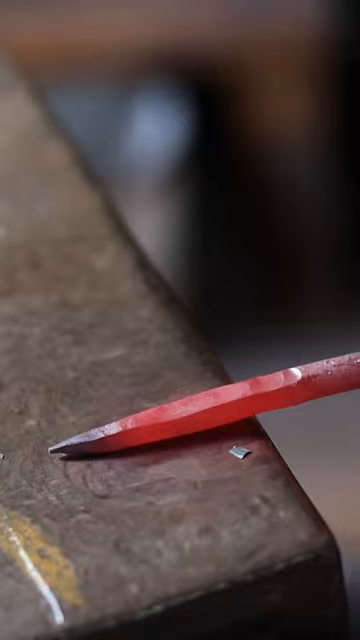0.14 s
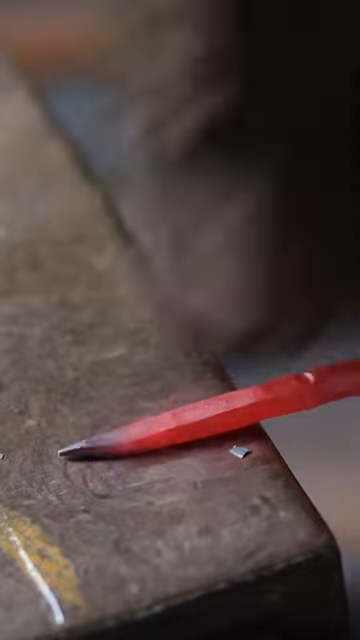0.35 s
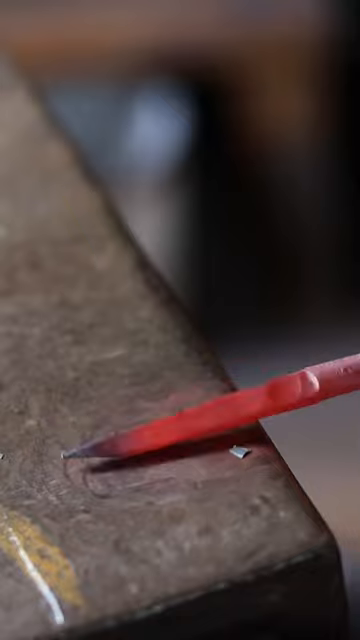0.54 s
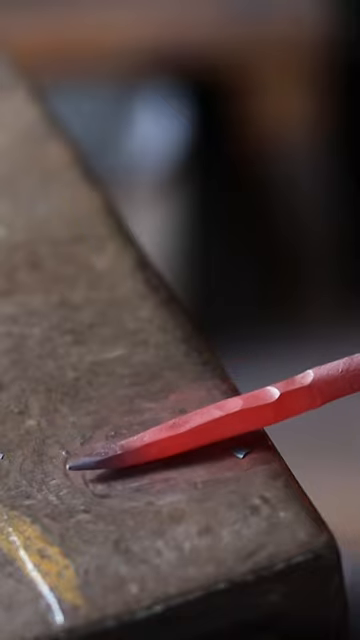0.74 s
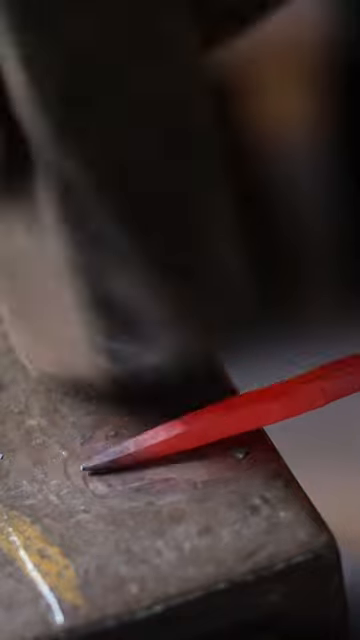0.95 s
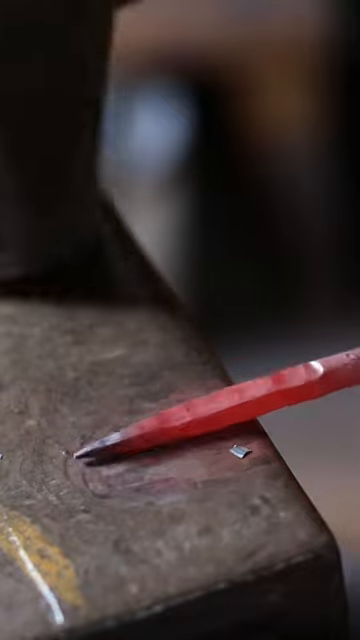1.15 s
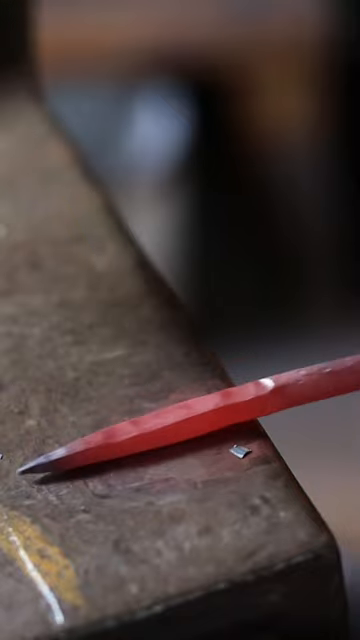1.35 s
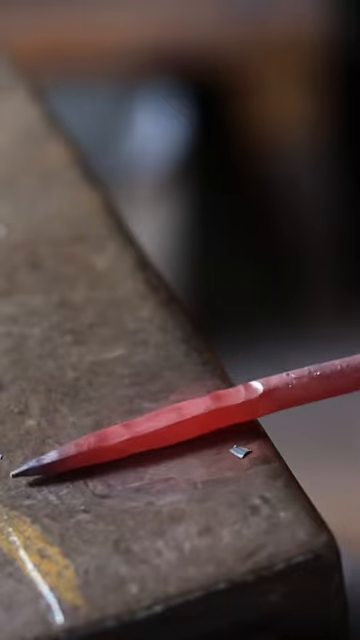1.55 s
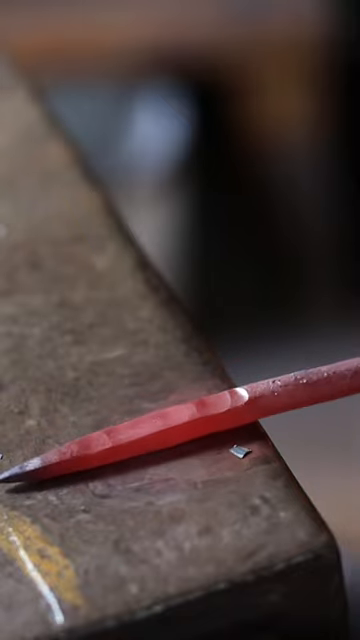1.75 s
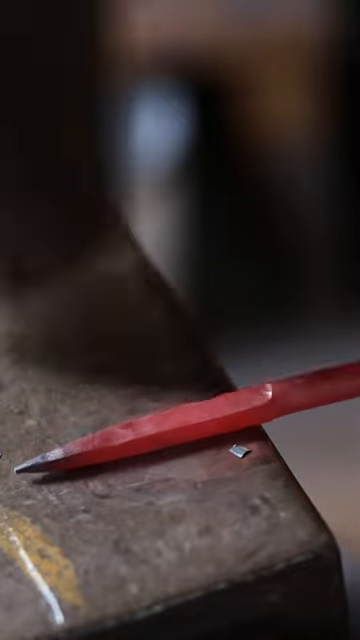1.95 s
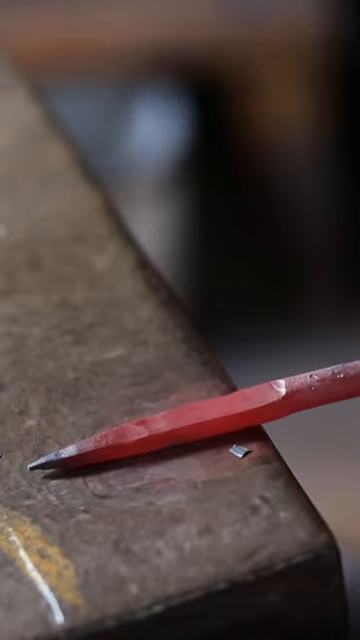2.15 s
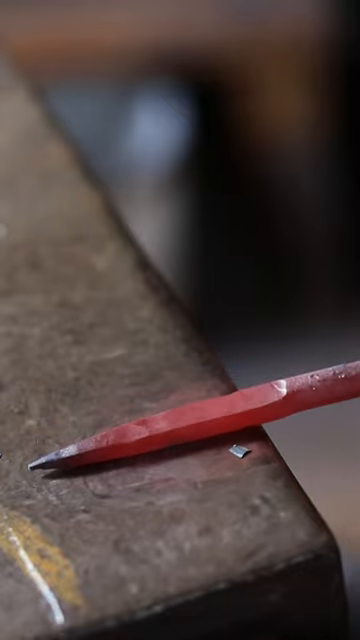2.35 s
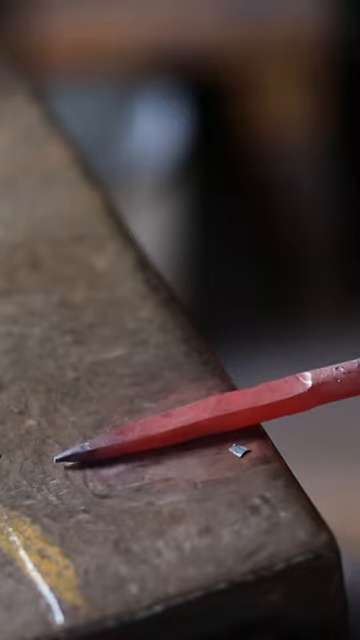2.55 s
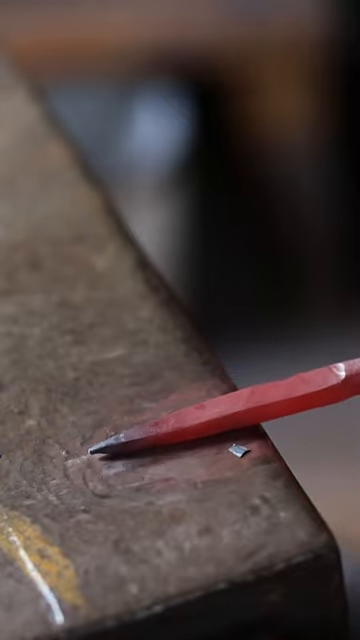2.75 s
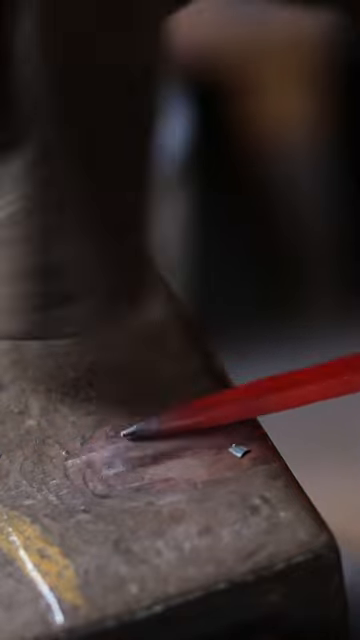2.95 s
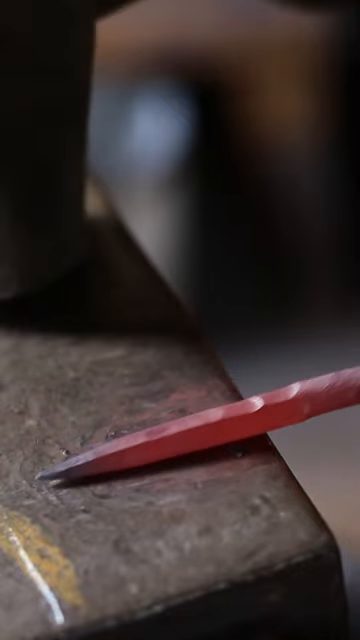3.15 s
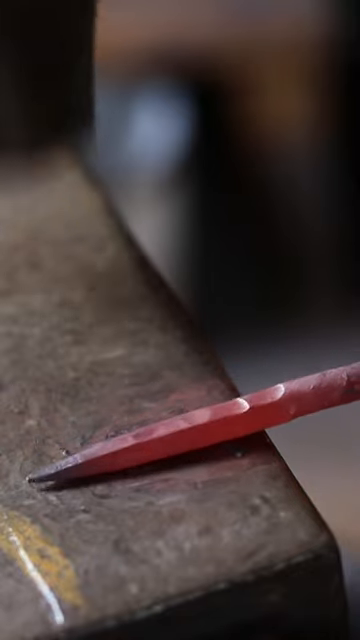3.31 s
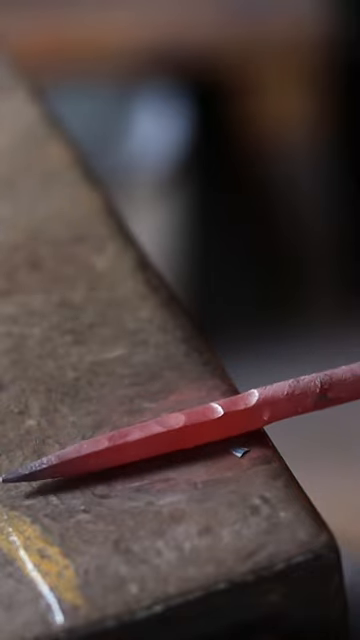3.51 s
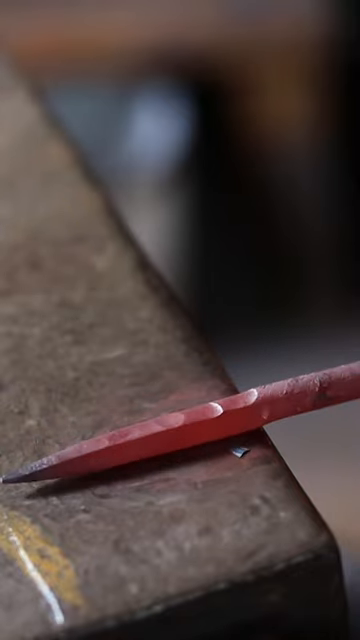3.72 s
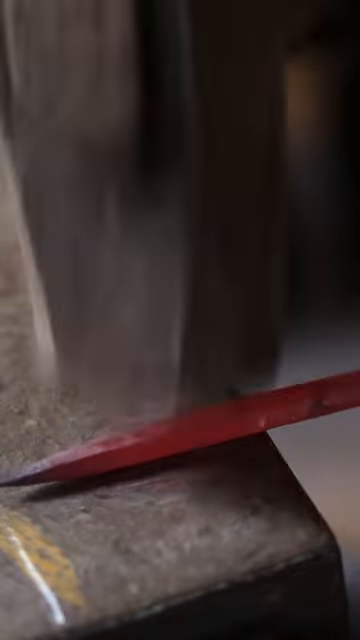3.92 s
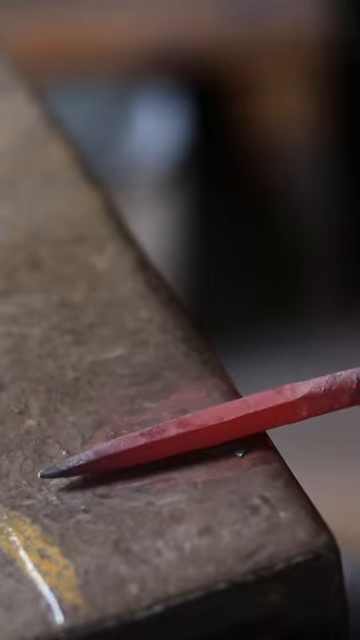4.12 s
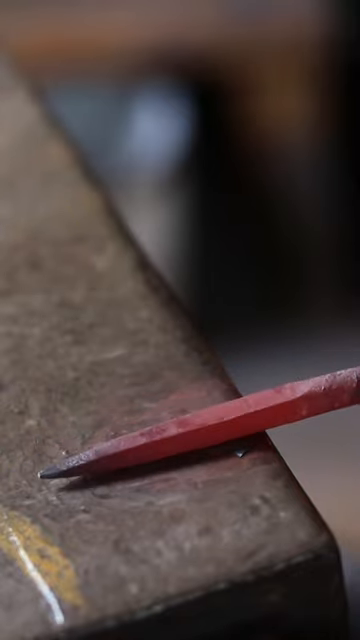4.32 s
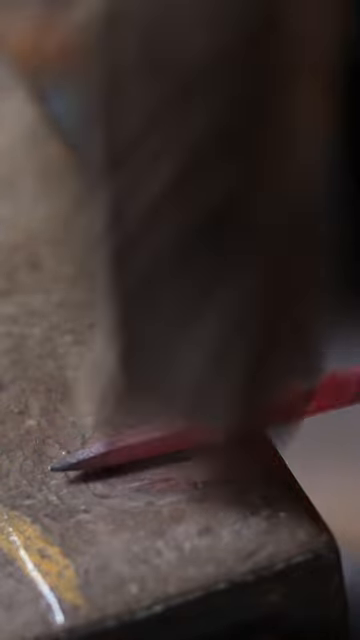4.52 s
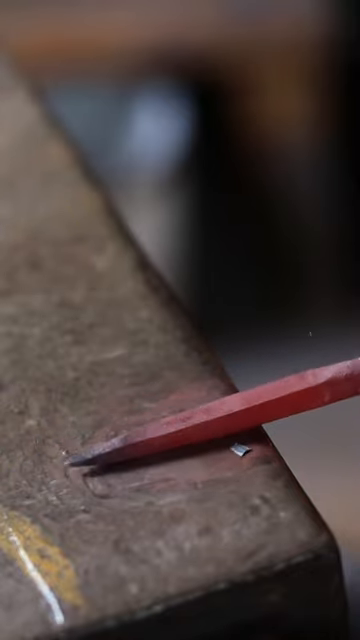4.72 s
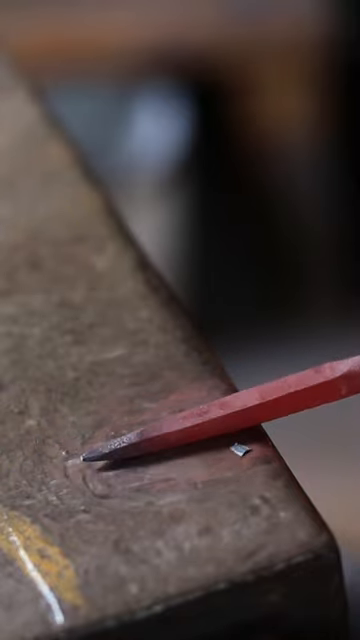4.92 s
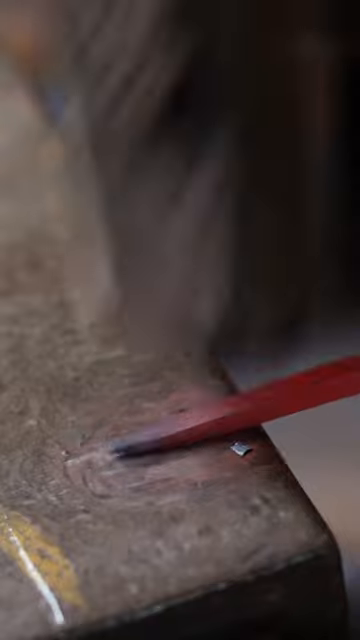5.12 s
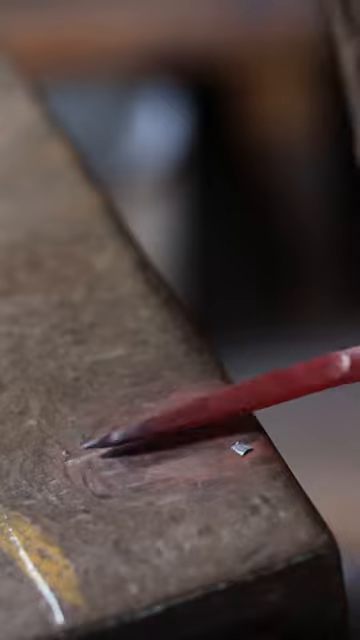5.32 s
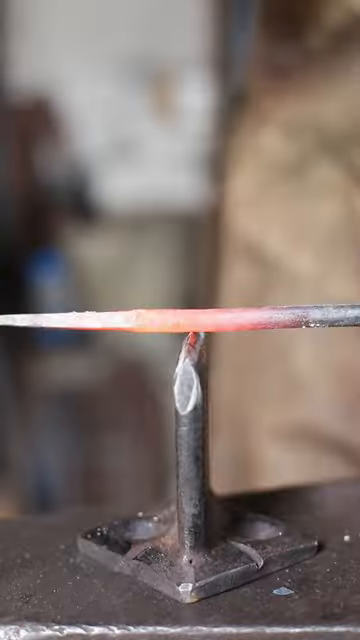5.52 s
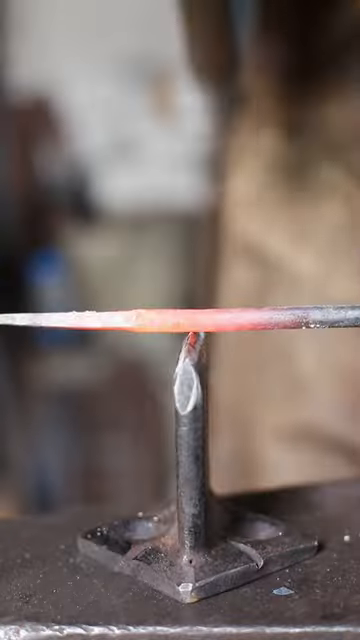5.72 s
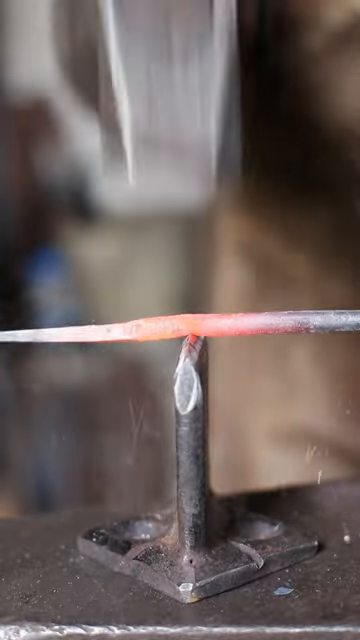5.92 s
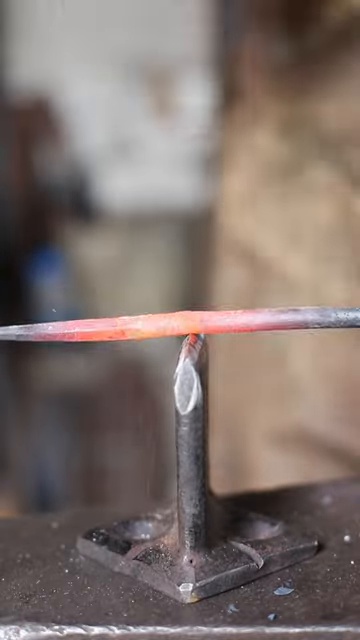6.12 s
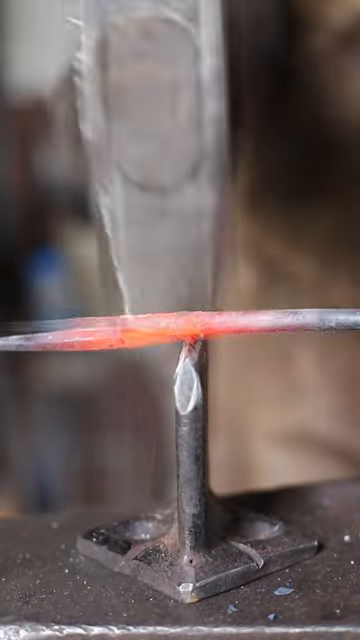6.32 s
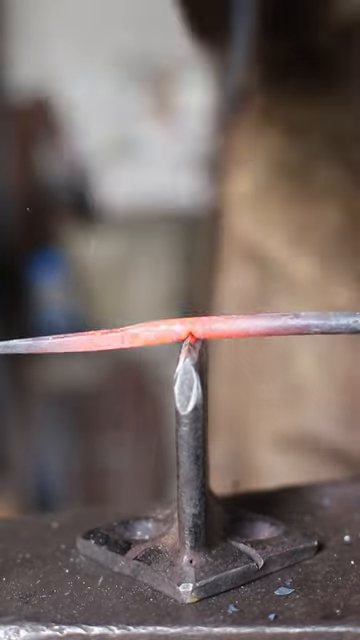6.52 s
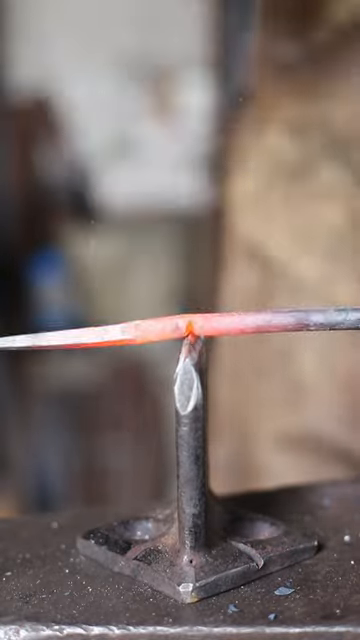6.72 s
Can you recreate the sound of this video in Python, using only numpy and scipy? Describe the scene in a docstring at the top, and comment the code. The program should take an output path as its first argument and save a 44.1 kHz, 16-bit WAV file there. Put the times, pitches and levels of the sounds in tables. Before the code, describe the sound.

In a small forge, a hammer strikes a hot iron rod on an anvil eight times, each blow ringing briefly and booming in the room. After the second and fifth blows the hammer bounces lightly on the anvil, and the rod ticks and faintly slides in pauses. Two booming blows on a metal post finish, its base plate slapping the anvil. A blower runs behind, and the very close microphone overloads on every blow.

```python
"""A small forge, one microphone so close to the anvil that every blow overloads it. A blower runs behind.
The smith hammers a hot iron rod eight times on the anvil face: steel rings and the workshop booms.
After the second and fifth blows the hammer is let down to bounce; the rod slides and ticks in two pauses.
Last come two blows on a post standing on the anvil: it booms, and its base plate slaps the face."""
import sys
import numpy as np
from scipy import signal
from scipy.fft import rfft, irfft
from scipy.io import wavfile

SR = 44100
rng = np.random.default_rng(int(sys.argv[2]) if len(sys.argv) > 2 else 0)


def master(y):
    """Save y as 16-bit WAV."""
    cut = np.clip(np.atleast_2d(y).T, -1, 1)
    pcm = np.round(cut * 32767)  # scale
    wavfile.write(sys.argv[1], SR, pcm.astype(np.int16))


N = 298116
AGE = np.arange(SR) / SR  # seconds since a contact

# Blows on the face. Each row: start in seconds, thud in dB, contact in dB (how solidly the blow
# carries through the rod into the anvil), hammer ring in dB.
FACE_BLOWS = [(0.2888, 0.5, -6.5, 9.5), (0.9069, 1.5, -7, 9), (1.8156, 1, 0, 12.5), (2.3795, 0, 0, 14.5),
              (2.8786, -0.5, 0, 13.5), (3.8905, 2, 3.5, 8), (4.4817, 2, -1.5, 16), (5.0885, 2, -1.5, 13.5)]
# The hammer let down. Each row: first and last contact in seconds, ratio of a gap to the one before,
# number of contacts, then the first contact's thud, clash, anvil ring and hammer ring in dB.
HAMMER_DROPS = [(1.011, 1.079, 0.94, 4, -23.5, -2, -17.5, 1.5),
                (2.983, 3.161, 0.64, 5, -6.5, 0.5, -9.5, -3.5)]
# The rod slides over scale. Each row: start in seconds, length in seconds, level in dB.
ROD_SLIDES = [(1.168, 0.14, -47.5), (5.34, 0.23, -53)]
# The rod is set down or turned. Each row: start in seconds, level in dB.
ROD_TICKS = [(1.5807, -17.5), (1.763, -40)]
# Blows on the post. Each row: start and lag of the plate's slap in seconds, then thud, clash,
# anvil ring, post boom, post ring and clink in dB.
POST_BLOWS = [(5.7645, 0.0002, 0.5, 2.5, -6.5, -1, -2.5, -25),
              (6.3214, 0.021, -0.5, -2.5, -10.5, 2, -14.5, -8.5)]

# What rings. Each row: pitch in Hz, relative level in dB, seconds to fall 60 dB before any damping
# factor, share of the ring that wavers through the room.
ROOM_MODES = [(221, -32.5, 0.73, 0.24), (293.7, -9.5, 0.65, 0.64), (366.8, -13.5, 0.73, 0.95),
              (408, -20, 0.25, 0.61), (488.3, -11, 0.57, 0.19), (597.6, -12, 0.54, 0.42),
              (790.5, -8, 0.38, 1)]
KNOCK_MODES = [(1768, 11.3, 0.019, .2)]
ROD_MODES = [(2760, -8.5, .25, .8), (3116, -17.5, 0.14, .8), (3430, -16.5, 0.35, 0.56),
             (3965, -14, 0.37, .8), (4320, -11, 0.27, 1), (5200, -21.5, .22, .8), (9065, -23, 0.14, 0.95)]
ANVIL_MODES = [(2405, 0, .55, .3), (2541, 1, .42, .6), (6045, -11, .33, .5), (6648, -19, .36, .6),
               (7360, -17, .33, .6)]
HAMMER_MODES = [(7250, -13, .22, .7), (7596, 0, .26, .5), (10325, -21, .2, .7), (13095, -19, .18, .6),
                (14280, -15, .2, .4)]
POST_BOOM_MODES = [(140, -12, .4, .6), (232, 0, .3, .45), (280, 2, .36, .35), (442, -9, .4, .6),
                   (474, -13, .45, .6), (585, -10, .38, .7), (696, -7, .3, .7), (785, -12, .4, .7),
                   (1010, -7, .25, .6)]
POST_RING_MODES = [(3252, -16, .2, .7), (3480, -14, .22, .7), (4974, -8, .1, .7), (6045, -2, .24, .5),
                   (6640, -11, .25, .7), (7364, -2, .38, .5), (7930, -10, .2, .6), (8608, -3, .24, .6),
                   (11000, -7, .13, .7), (13610, -7, .16, .6), (14900, -7, .11, .6)]
POST_CLINK_MODES = [(646, -2, .12, .4), (2555, 0, .1, .3), (3460, -4, .11, .5), (5780, -6, .08, .3),
                    (7610, -7, .1, .5), (7930, -2, .13, .4), (8550, 0, .1, .5), (11400, -7, .07, .6)]
PLATE_MODES = [(1004, 7, 0.2, 0.24)]

# The colour of each noise at the microphone. Each row: frequency in Hz, relative density in dB.
BLOWER_SPECTRUM = [(20, -24.5), (50, -3), (75, -16), (120, -6.5), (190, 3), (270, -2), (450, -6),
                   (700, -9.5), (1400, -11.5), (2260, -18.5), (4000, -25), (8000, -35.5), (12000, -38),
                   (16000, -38)]
THUD_SPECTRUM = [(25, -16), (55, -9), (85, -14), (130, -6.5), (220, 1), (400, 2), (700, 0.5), (1100, -11.5),
                 (2000, -14.5), (5000, -26)]
CLASH_SPECTRUM = [(200, -4), (900, 1), (1300, -0.5), (1900, 6.5), (2500, 3.5), (3200, 1), (5000, -2),
                  (7500, 0), (10000, -9), (16000, -7)]
TICK_SPECTRUM = [(300, -22), (900, -13), (1270, -6), (1600, -8), (1940, 0), (2520, -5), (3200, -18),
                 (5000, -28), (15000, -44)]
PLATE_SPECTRUM = [(200, -15), (900, 2), (1400, -20), (2500, -2.5), (4000, -1.5), (7500, -0.5), (10000, -5),
                  (16000, -8)]
# The blower's motor. Each row: pitch in Hz, level in dB.
MOTOR_TONES = [(51, -56), (112, -53.5), (200, -44), (371, -40.5), (595, -44.5), (957, -49.5), (1048, -47)]
# The workshop's echo. Each row: frequency in Hz, seconds to fall 60 dB before any damping factor.
ROOM_DECAY = [(60, 0.72), (200, 0.64), (500, 0.52), (1000, 0.51), (2000, 0.43), (4000, 0.33), (8000, 0.27),
              (15000, 0.2)]


def amp(db):
    """Decibels to gain."""
    return 10 ** (np.asarray(db) / 20)


def unit(x):
    """Scales to rms 1."""
    return x / np.sqrt(np.mean(abs(x) ** 2) + 1e-20)


def curve_at(points, hz):
    """Joins points by straight lines on a log-frequency axis."""
    point_hz, value = np.transpose(points)
    return np.interp(np.log(hz + 1), np.log(point_hz), value)


def add(mix, start_s, sound):
    """Adds a sound into the mix at its start time."""
    part = mix[round(start_s * SR):][:len(sound)]
    part += sound[:len(part)]


def noise(spectrum, size):
    """Steady noise of rms 1 with the given spectrum."""
    hz = np.fft.rfftfreq(size, 1 / SR)
    return unit(irfft(rfft(rng.standard_normal(size)) * amp(curve_at(spectrum, hz)), size))


def waver(t, rate_hz):
    """A random complex gain of power 1, like the drifting sum of many reflections."""
    hz = rng.normal(0, rate_hz, (12, 1))
    knots = np.linspace(0, t[-1], len(t) // 100)
    paths = np.exp(2j * np.pi * (hz * knots + rng.random(hz.shape)))
    return np.interp(t, knots, unit(paths.sum(0)))


def blower(air_db=-33.5):
    """In the background, a steady rush of air with a few unsteady motor tones."""
    t = np.arange(N) / SR
    hum = sum(amp(db) * (waver(t, 2.7) * np.exp(2j * np.pi * hz * t)).real for hz, db in MOTOR_TONES)
    return amp(air_db) * noise(BLOWER_SPECTRUM, N) + hum


def blow(start_s, thud_db, contact_db, hammer_db):
    """One full blow's contact: a solid one clashes harder and leaves the hammer duller and shorter."""
    clash_db = 7 + 0.25 * contact_db
    lift_db_per_octave = -6 - 2.1 * contact_db
    hammer_damping = max(1.164 + 0.0584 * contact_db, 0.1)
    return start_s, thud_db, clash_db, contact_db, hammer_db, lift_db_per_octave, hammer_damping


def burst(spectrum, rise_s, damping):
    """A short impact scattered by the workshop into dense echoes; the treble dies first."""
    hz, t, bands = signal.stft(noise(spectrum, SR), SR, nperseg=512)
    decay = amp(-60 * damping * t / curve_at(ROOM_DECAY, hz)[:, None])
    echoes = signal.istft(bands * decay, SR, nperseg=512)[1][:SR]
    return echoes * (1 - np.exp(-AGE / rise_s))


def ring(modes, lift_db_per_octave=0, damping=1, waver_hz=9, build_s=0.003):
    """Dying modes; reflections build up and make each swell and sink at the microphone."""
    out = np.zeros(SR)
    for hz, db, t60, wet in modes:
        reflections = wet * waver(AGE, waver_hz) * (1 - np.exp(-AGE / build_s))
        paths = np.sqrt(1 - wet ** 2) + reflections
        level = amp(db + lift_db_per_octave * np.log2(hz / modes[0][0]) - 60 * damping * AGE / t60)
        out += level * (paths * np.exp(2j * np.pi * hz * AGE)).imag
    return out


def early_boost(db, length_s):
    """Strong motion and near reflections hold the level up at first, before the quiet tail."""
    return 1 + amp(db) * np.exp(-(AGE / length_s) ** 2)


def clash(direct_db, direct_s, damping):
    """Steel meets steel close by: a sharp direct crack, then its echoes."""
    direct = amp(direct_db) * np.exp(-AGE / direct_s)
    return burst(CLASH_SPECTRUM, rise_s=0.00036, damping=damping) * (1 + direct)


def strike(contacts, anvil_modes, hammer_modes, direct_db, direct_s, room_damping,
           anvil_lift_db_per_octave, rod_db):
    """Each contact knocks and clashes; rod, anvil and hammer ring, the workshop's low resonances boom."""
    out = np.zeros(N)
    for start_s, thud_db, clash_db, anvil_db, hammer_db, hammer_lift, hammer_damping in contacts:
        thud = burst(THUD_SPECTRUM, rise_s=0.0035, damping=room_damping) + ring(ROOM_MODES)
        thud *= early_boost(db=-8.5, length_s=0.12)
        crack = clash(direct_db, direct_s, room_damping) + ring(KNOCK_MODES)
        crack += amp(rod_db) * ring(ROD_MODES, waver_hz=22)
        # a hammer pressed on the face damps the anvil too, except for its lowest mode
        lowest = ring(anvil_modes[:1], waver_hz=12)
        upper = ring(anvil_modes[1:], anvil_lift_db_per_octave, max(hammer_damping, 1), waver_hz=12)
        anvil = (lowest + upper) * early_boost(db=4, length_s=0.11)
        hammer = ring(hammer_modes, hammer_lift, hammer_damping, waver_hz=8) * choke(start_s)
        steel = amp(clash_db) * crack + amp(anvil_db) * anvil + amp(hammer_db) * hammer
        add(out, start_s, amp(thud_db) * thud + steel)
    return out


def bounce(first_s, last_s, gap_ratio, count, *first_levels_db, lift_db_per_octave=-0.5):
    """The contacts of a bouncing hammer: each comes sooner, weaker and more damped than the last."""
    loss_db = np.array([4, 6, 4, 8])  # per bounce: thud, clash, anvil ring, hammer ring
    elapsed = np.cumsum([0] + [gap_ratio ** k for k in range(count - 1)])
    times = first_s + (last_s - first_s) * elapsed / elapsed[-1]
    for k, start_s in enumerate(times):
        levels_db = np.array(first_levels_db) - k * loss_db
        hammer_damping = 0.83 + 0.4 * k
        yield start_s, *levels_db, lift_db_per_octave, hammer_damping


def off_centre(modes, favoured, db):
    """A bounce lands off centre and wakes one mode more than the rest."""
    return [(hz, level + db * (k == favoured), t60, wet) for k, (hz, level, t60, wet) in enumerate(modes)]


def choke(start_s, db_per_s=82):
    """Gain on the hammer's ring, falling once it lies still on the face after its last bounce."""
    rests = [last_s for _, last_s, *_ in HAMMER_DROPS if last_s >= start_s]
    return amp(-db_per_s * sum(np.maximum(start_s + AGE - rest_s, 0) for rest_s in rests))


def rod_handling():
    """Small dull ticks and a faint gritty slide as the rod is moved between blows."""
    out = np.zeros(N)
    tick_decay = np.exp(-AGE / 0.0044) + 0.18 * np.exp(-AGE / 0.035)
    tick_rise = 1 - np.exp(-AGE / 0.0006)
    for start_s, db in ROD_TICKS:
        add(out, start_s, amp(db) * noise(TICK_SPECTRUM, SR) * tick_decay * tick_rise)
    for start_s, length_s, db in ROD_SLIDES:
        size = round(length_s * SR)
        hiss = noise([(3000, -25), (8000, 8), (14500, -4)], size)
        grit = abs(waver(AGE[:size], rate_hz=61))
        add(out, start_s, amp(db) * hiss * grit * np.hanning(size))
    return out


def post():
    """The post cracks, clinks and booms under the hammer; then its base plate slaps the anvil."""
    out = np.zeros(N)
    for start_s, lag_s, thud_db, clash_db, anvil_db, boom_db, ring_db, clink_db in POST_BLOWS:
        crack = amp(2) * noise(PLATE_SPECTRUM, SR) * np.exp(-AGE / 0.0015)
        boom = amp(boom_db) * ring(POST_BOOM_MODES) * (1 - np.exp(-AGE / 0.026))
        steel = amp(anvil_db) * ring(ANVIL_MODES) + amp(ring_db) * ring(POST_RING_MODES)
        clink = amp(clink_db) * ring(POST_CLINK_MODES)
        add(out, start_s, crack + boom + steel + clink)
        thud = amp(thud_db) * burst(THUD_SPECTRUM, rise_s=0.0075, damping=1.16)
        slap = amp(clash_db) * burst(PLATE_SPECTRUM, rise_s=0.0004, damping=1.15)
        clonk = amp(clink_db) * ring(PLATE_MODES)
        add(out, start_s + lag_s, thud + slap + clonk)
    return out


def scene():
    """The forge from beside the anvil. There is one microphone, so both channels are alike."""
    heavy = [blow(*row) for row in FACE_BLOWS]
    light = [contact for row in HAMMER_DROPS for contact in bounce(*row)]
    blows = strike(heavy, ANVIL_MODES, HAMMER_MODES, direct_db=8.5, direct_s=0.0037,
                   room_damping=1.003, anvil_lift_db_per_octave=1, rod_db=-4)
    anvil_modes = off_centre(ANVIL_MODES, favoured=1, db=7.5)
    hammer_modes = off_centre(HAMMER_MODES, favoured=0, db=11.5)
    bounces = strike(light, anvil_modes, hammer_modes, direct_db=7, direct_s=0.0022,
                     room_damping=1.8, anvil_lift_db_per_octave=-16.5, rod_db=-9)
    mono = blows + bounces + post() + rod_handling() + blower()
    return np.array([mono, mono])


def record(dry, ceiling=0.72, band_limit_hz=15850):
    """This close, the input clips flat on every blow; the band limit rounds the corners into ripples."""
    clipped = np.clip(dry, -ceiling, ceiling)
    lowpass = signal.firwin(255, band_limit_hz, window=("kaiser", 8), fs=SR)
    return signal.oaconvolve(clipped, lowpass[None], "same")


dry = scene()
out = record(dry)
master(out)
```